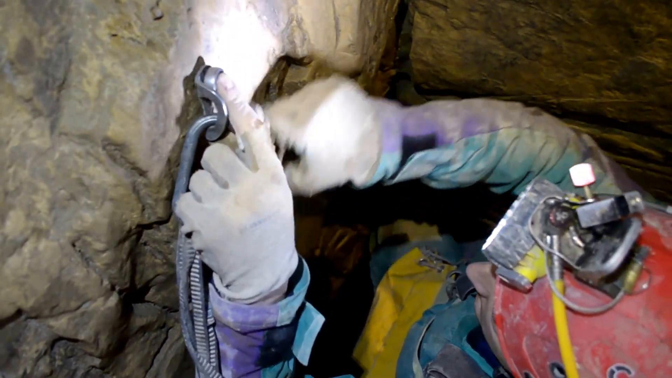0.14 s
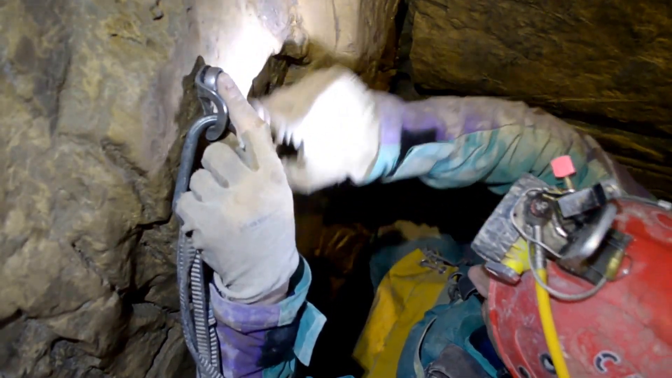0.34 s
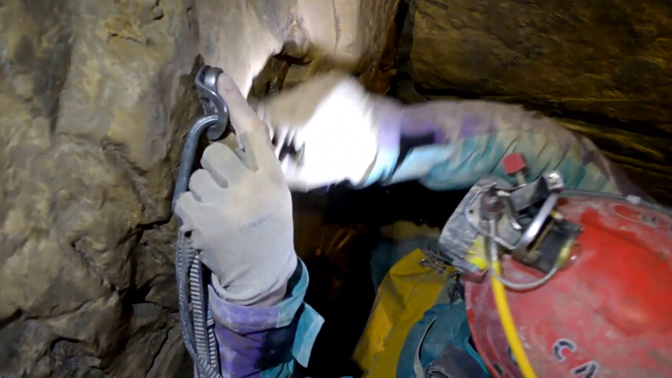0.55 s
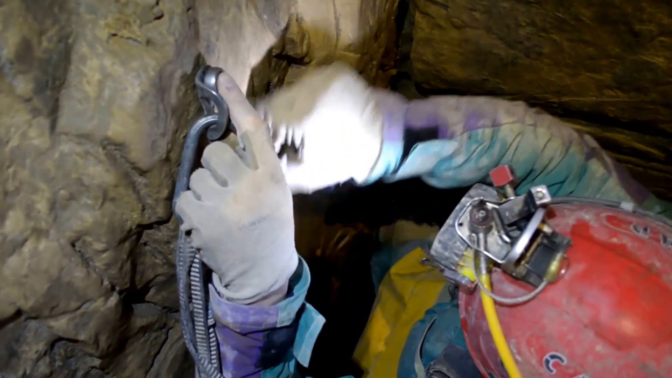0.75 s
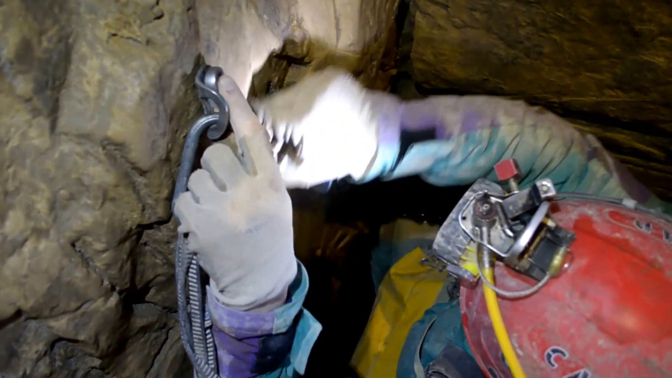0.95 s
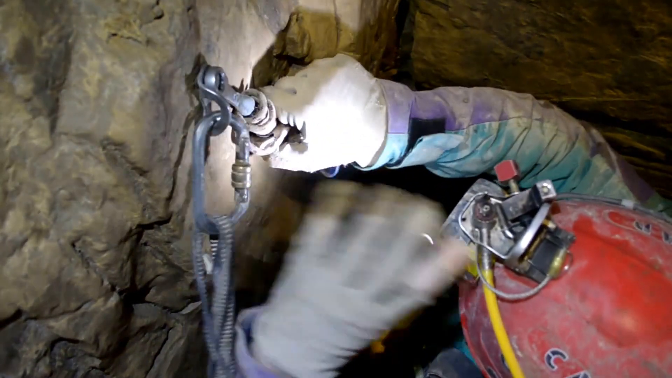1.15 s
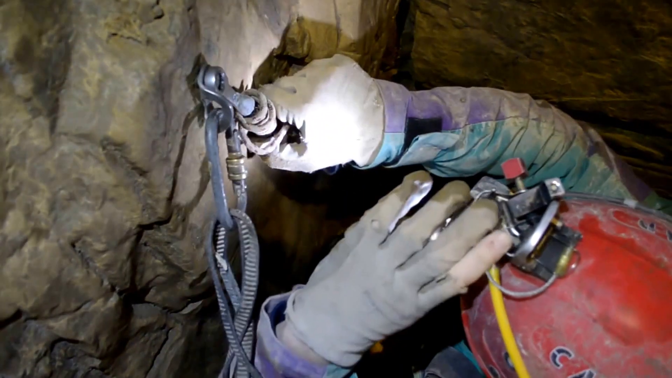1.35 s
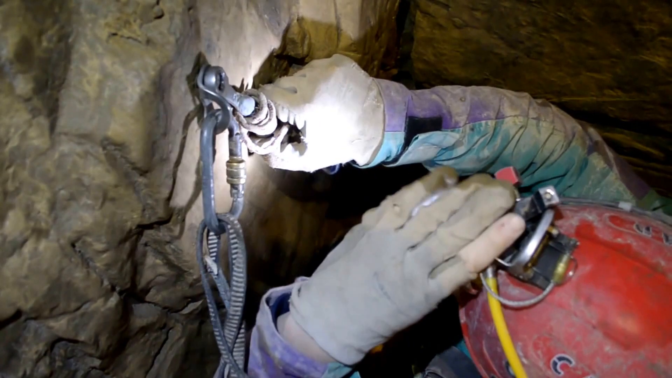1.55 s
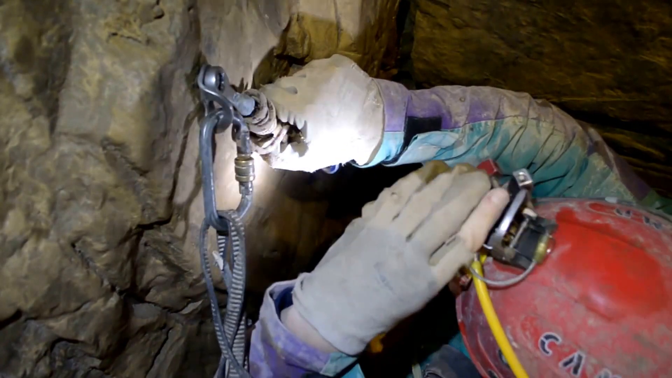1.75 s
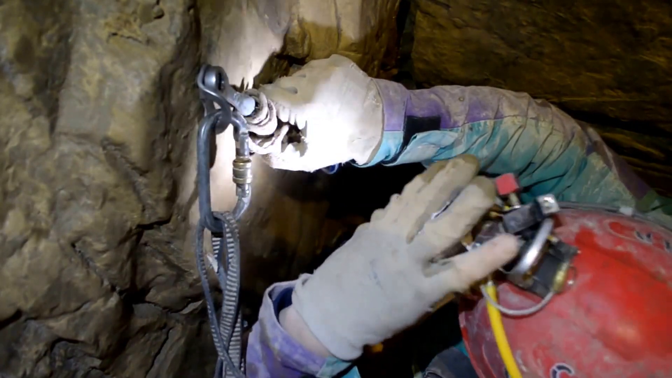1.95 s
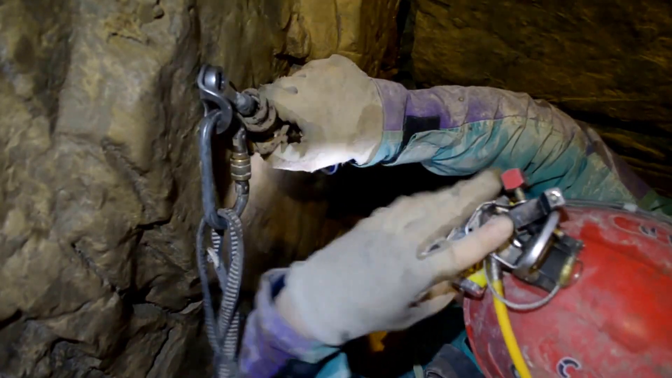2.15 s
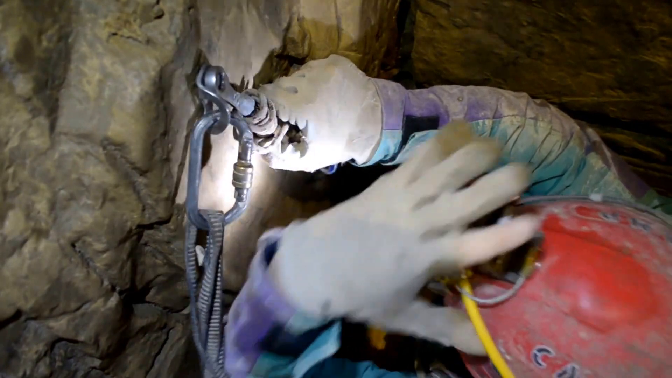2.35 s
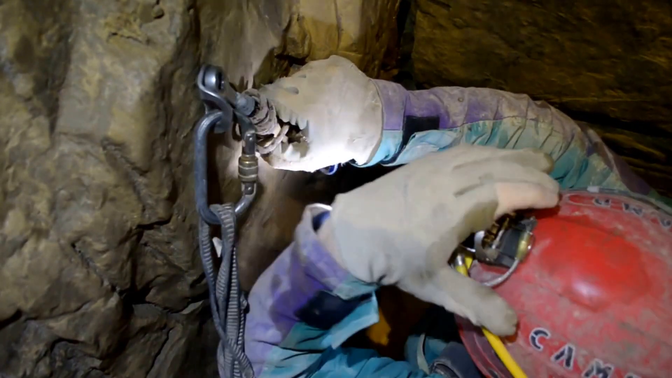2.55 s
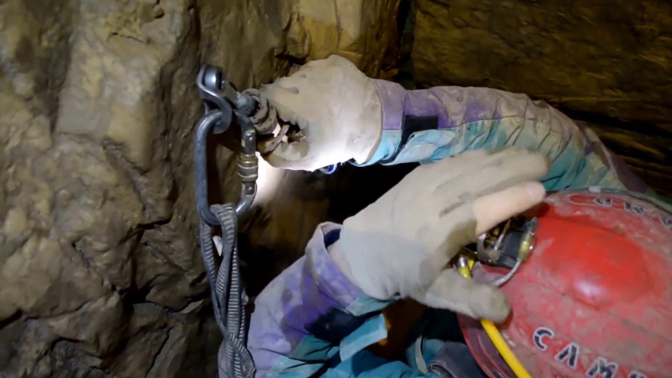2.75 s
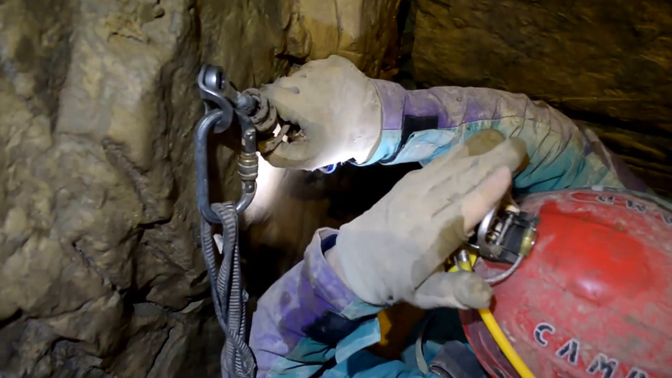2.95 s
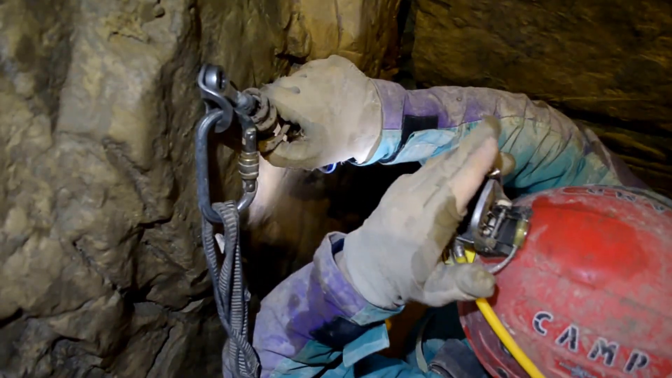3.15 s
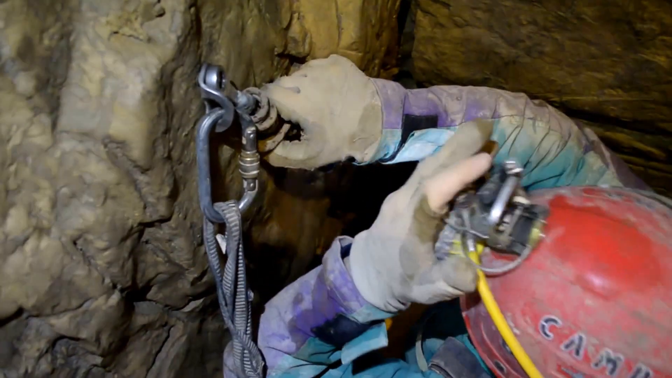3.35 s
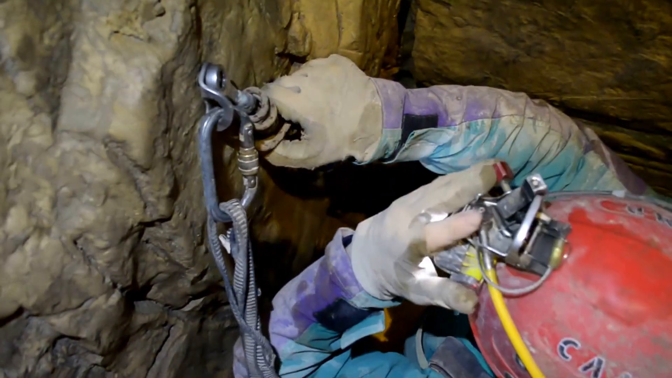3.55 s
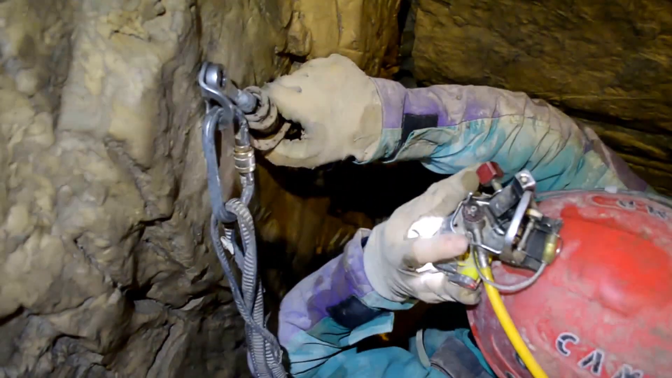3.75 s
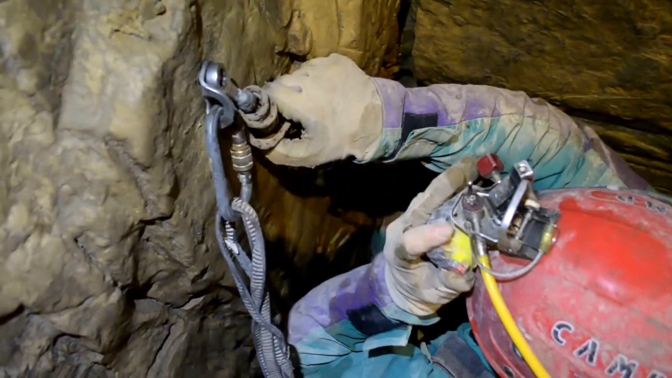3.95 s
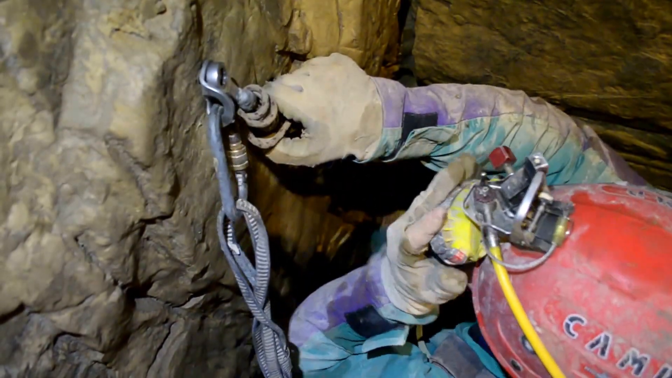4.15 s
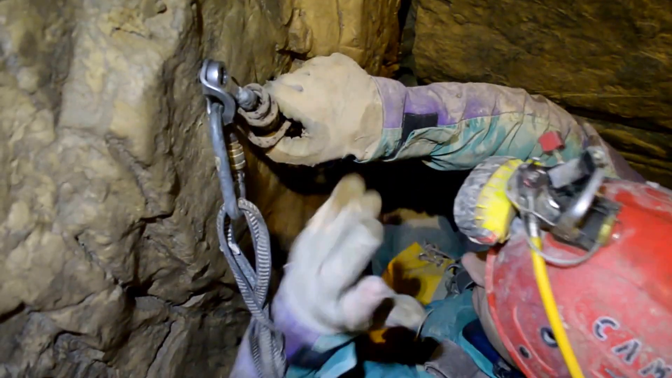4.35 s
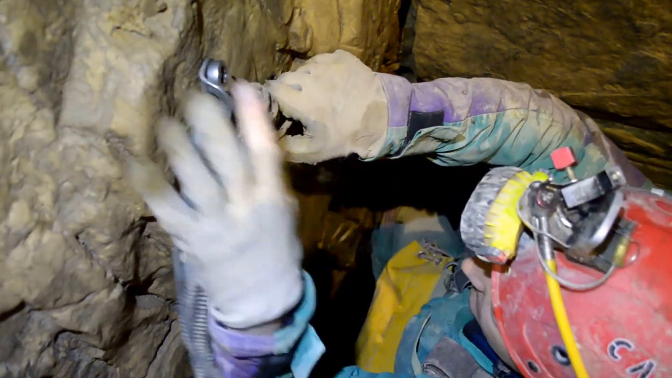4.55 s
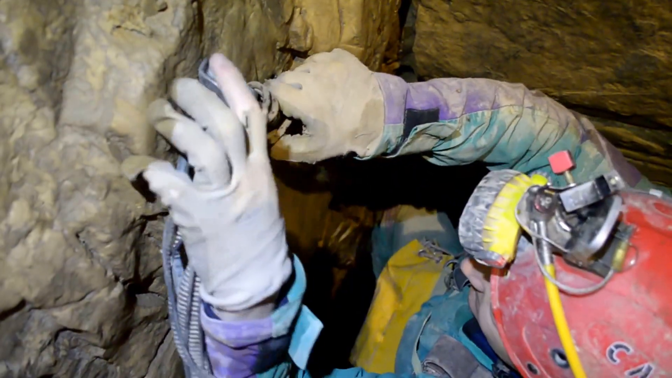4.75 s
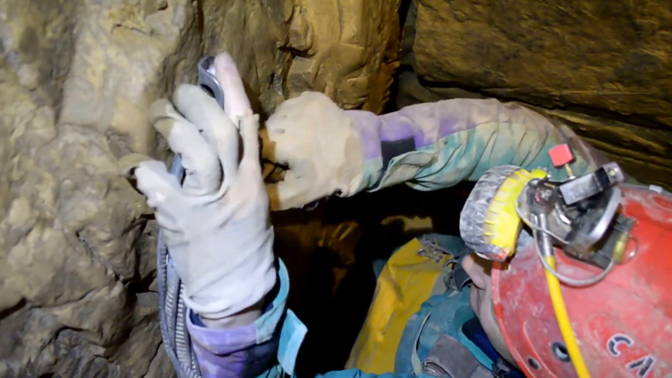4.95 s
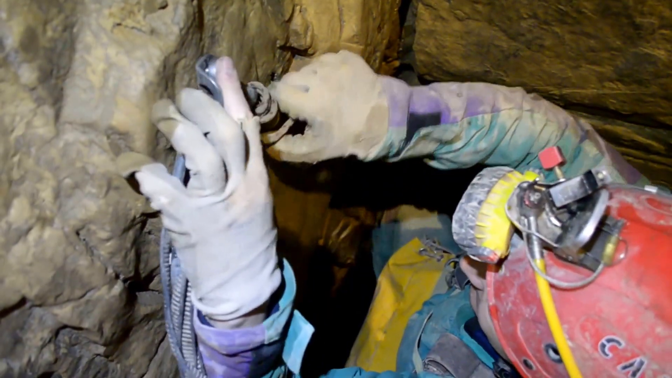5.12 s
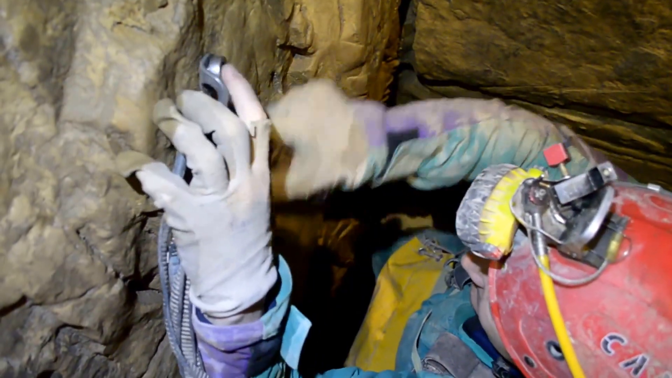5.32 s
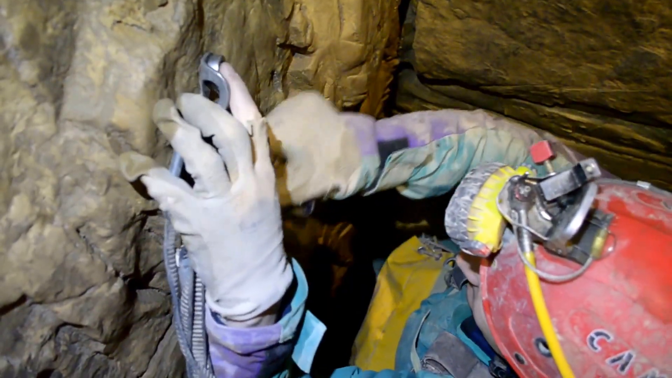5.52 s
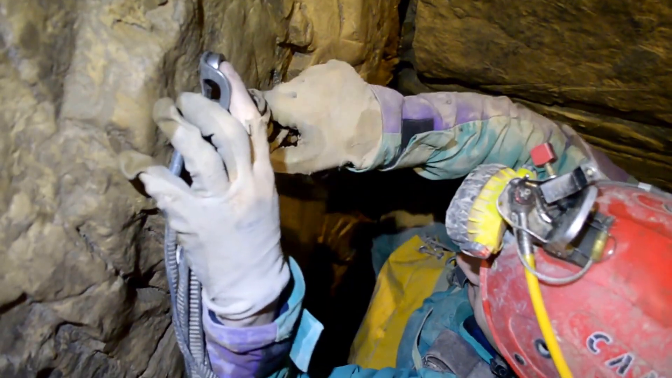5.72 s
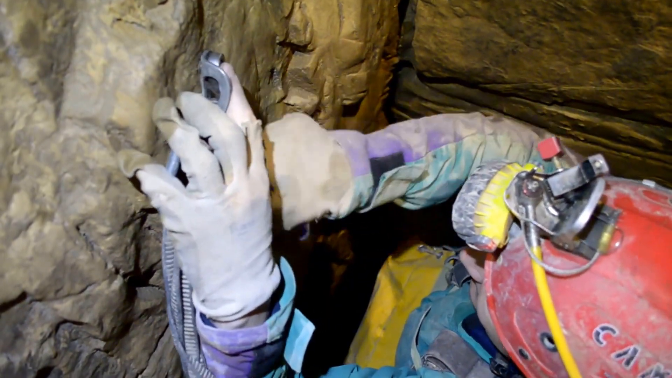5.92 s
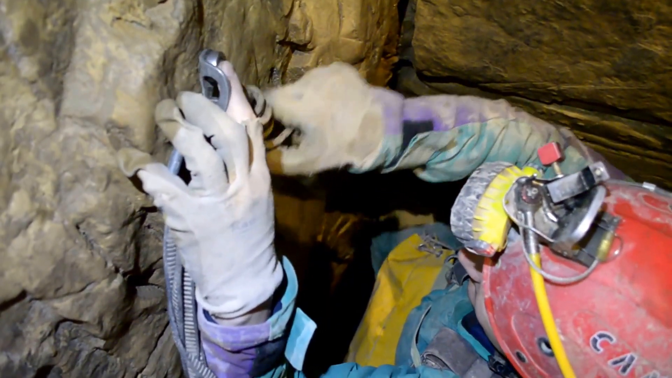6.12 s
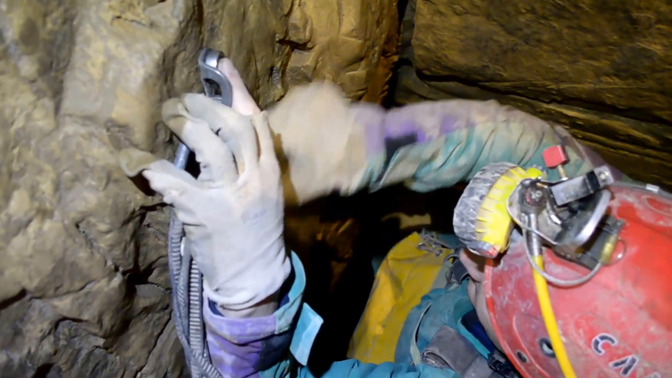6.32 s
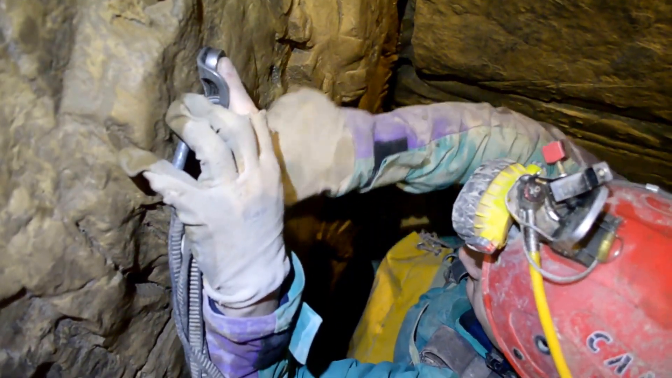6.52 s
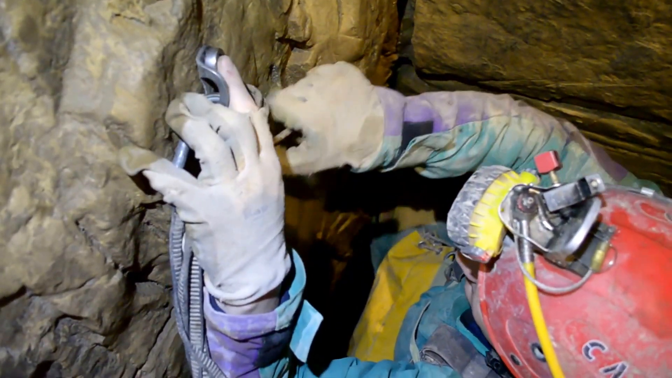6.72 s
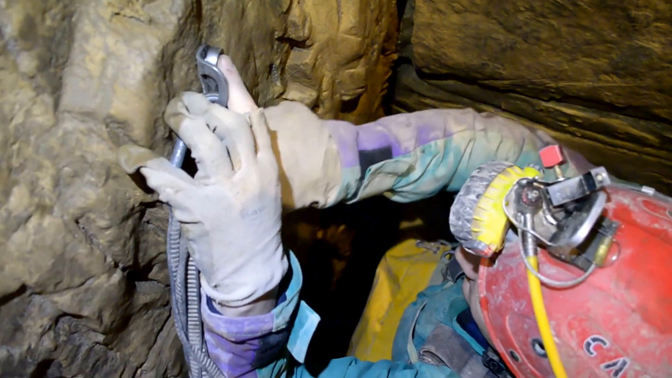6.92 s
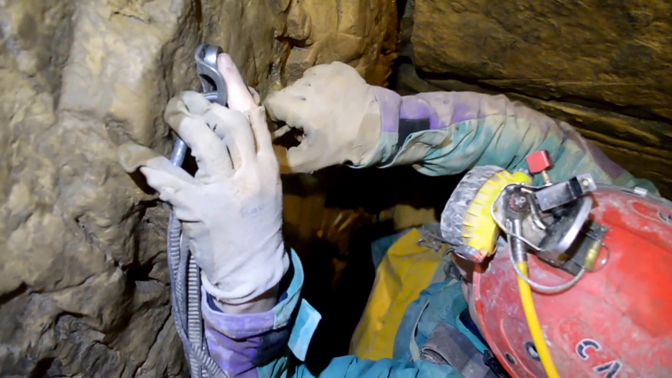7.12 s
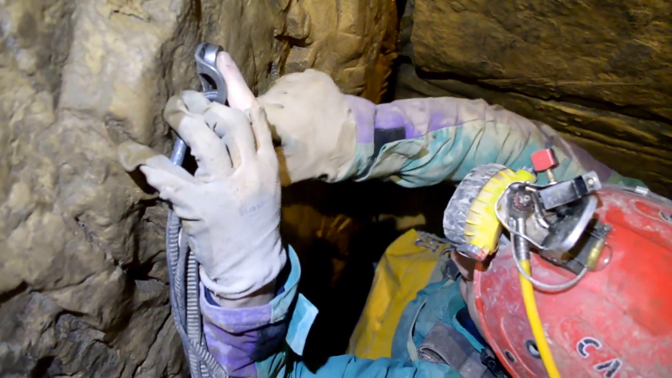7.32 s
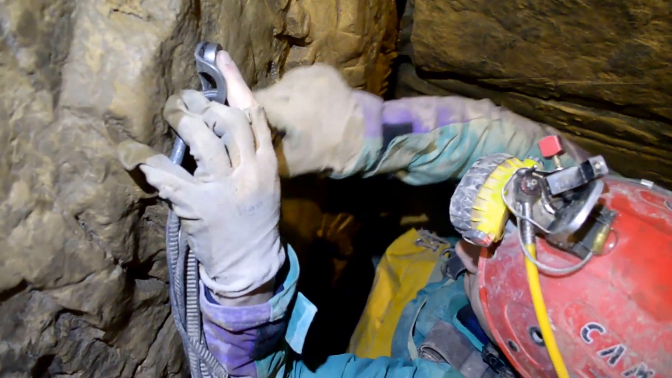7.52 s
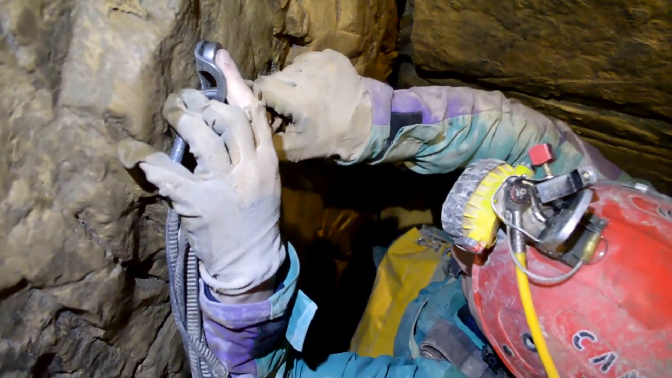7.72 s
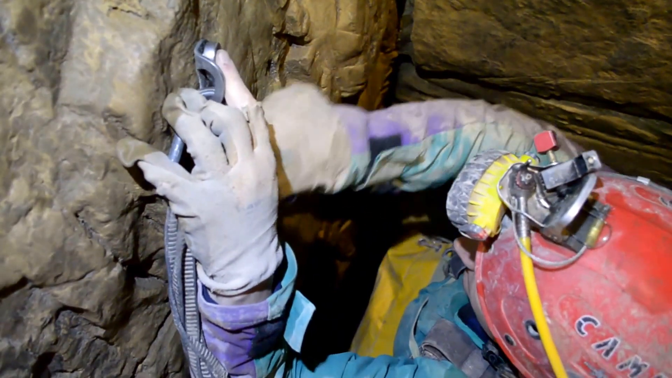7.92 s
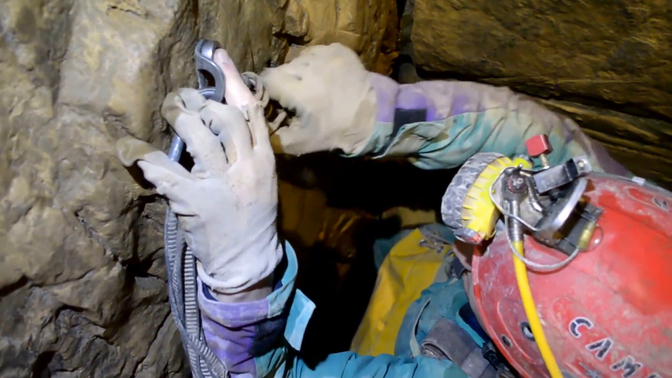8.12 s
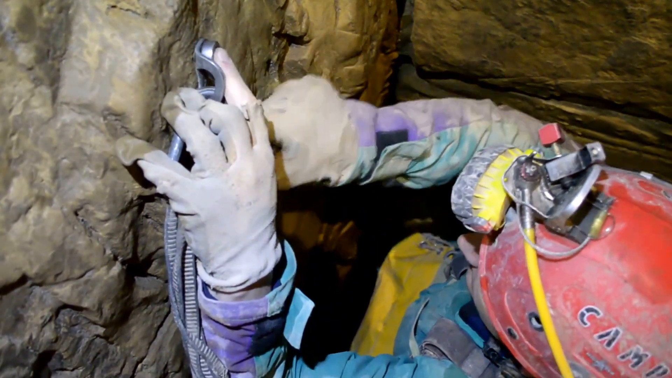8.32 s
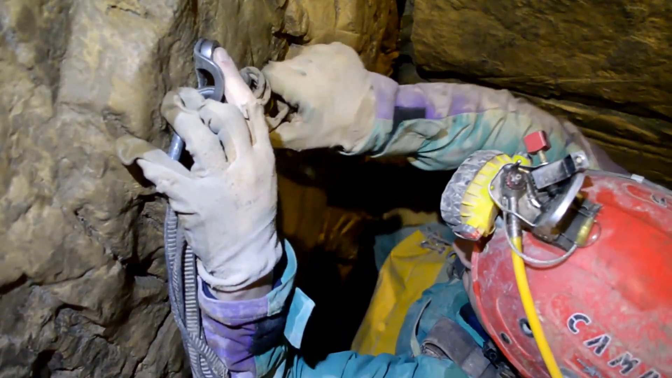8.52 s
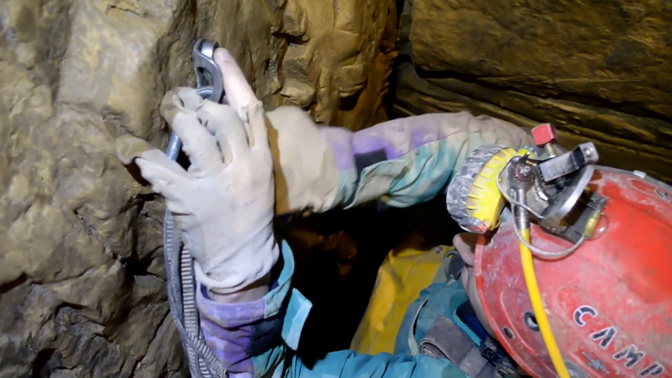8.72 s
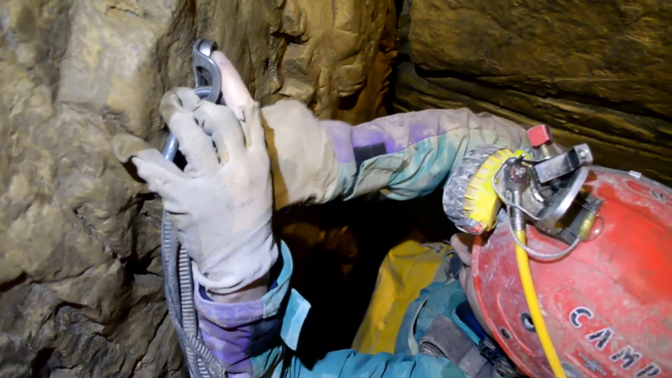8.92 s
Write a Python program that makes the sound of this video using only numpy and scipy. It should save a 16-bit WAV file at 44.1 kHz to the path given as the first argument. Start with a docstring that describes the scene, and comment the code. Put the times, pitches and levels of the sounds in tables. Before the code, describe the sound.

Close to the microphone in a narrow rock passage, coated cloth swishes in short arm strokes with small bright carabiner clinks. A glove rubs a hollow helmet and knocks its lamp, one knock strong. Near four seconds, six rapid ratchet snaps crack out, extremely loud and clipping. Rustling resumes with clinks and later dull, close gear bumps, over faint cave rush and a very thin high whine.

```python
"""In a narrow rock passage, two cavers work at a bolt, with the microphone close by.
One works an arm back and forth: grains of slipping cloth make the sleeve swish, and carabiners clink.
The other rubs a glove over a helmet lamp, knocks it, then tilts it through six ratchet notches: noise bursts
and decaying modes, loud enough to overload the microphone. Later, gear bumps dully close to the microphone.
Filtered echoes of the rock, the faint rush of the cave and a thin electronic whine lie around it all."""
import sys
import numpy as np
from scipy import signal
from scipy.fft import rfft, irfft, next_fast_len
from scipy.io import wavfile

SR = 44100
rng = np.random.default_rng(int(sys.argv[2]) if len(sys.argv) > 2 else 0)


def store_pcm(level_fs):
    """Save levels as 16-bit WAV."""
    pcm = np.round(np.clip(level_fs, -1, 1) * 32767).astype(np.int16)
    wavfile.write(sys.argv[1], SR, np.atleast_2d(pcm).T)


N = 399987
TIME = np.arange(N) / SR  # seconds from the start
AGE = TIME[:SR // 2]  # seconds since a contact, up to half a second

# spectrum of cloth hiss, shared by the carabiner gate: (frequency [Hz], level [dB])
HISS_SPECTRUM = [(1500, -11), (2600, -3.5), (3800, 6), (8100, -2.5), (11400, -0.5), (14000, -11),
                 (16000, -19.5)]


def lamp_ratchet():
    """Each notch of the lamp hinge snaps into the helmet shell and rings its modes."""
    # notches of the hinge: (time [s], level [dB], boost of the lower modes [dB])
    notches = [(3.9229, -10, -1), (3.9566, -2.5, -3), (3.994, -3, -3), (4.0543, -3.5, -1.5),
               (4.0942, -3, 1.5), (4.1250, -2.5, 4)]
    # resonances of the helmet shell: (frequency [Hz], level [dB])
    helmet_modes = [(395, -21.5), (468, -19), (513, -12), (832, -14), (893, -14.5), (1590, -10.5),
                    (1868, -10.5), (2024, -8.5), (2190, -12.5), (2470, -1.5), (2560, -3.5), (2657, -3.5),
                    (2915, -1.5), (3110, -11.5)]
    # spectrum of the snap: (frequency [Hz], level [dB])
    notch_spectrum = [(150, -25), (300, -7), (420, -10), (680, -4.5), (880, -0.5), (1150, -10), (1450, -2),
                      (2550, 0), (3400, -10.5), (6000, -14), (7000, -18), (11000, -16), (16000, -36)]
    out = np.zeros(N)
    for start, db, boost_db in notches:
        # lift the modes up to 2300 Hz against those near 2900 Hz, or the reverse
        tone = [(2300, boost_db), (2900, -boost_db), (4000, 0)]
        snap = blow(notch_spectrum, helmet_modes, tone, crack_t60=0.023,
                    scatter_db=-12.5, scatter_t60=0.13, ring_db=1, ring_t60=0.25)
        add(out, start, from_db(db) * snap)
    return out


def lamp_knocks():
    """A hand knocks lamp and helmet: hollow plastic modes under a short rattle."""
    # knocks: (time [s], level [dB], brightness [dB per octave])
    knocks = [(1.263, -37.5, -2), (1.604, -42, -1), (1.755, -45.5, 2), (1.976, -37.5, -1.5),
              (2.875, -15.5, -0.5), (2.902, -32.5, -6.5)]
    # resonances of the lamp housing: (frequency [Hz], level [dB])
    lamp_modes = [(519, -16), (824, -7.5), (1520, 0), (1912, -4), (2465, -3)]
    # spectrum of the knock: (frequency [Hz], level [dB])
    knock_spectrum = [(60, -35), (300, -9.5), (1900, -5), (3600, -21.5), (6000, -18.5), (12500, -18.5),
                      (16000, -39)]
    return contacts(knocks, knock_spectrum, lamp_modes, crack_t60=0.019,
                    scatter_db=12, scatter_t60=0.074, ring_db=5.0, ring_t60=0.18)


def helmet_rub(low_db=-9, grip_db=4):
    """The glove drags over the helmet in fits and starts and draws two hollow shell tones from it."""
    # pressure of the glove, as level of the shell tones: (time [s], level [dB])
    grip = [(1.2, -96), (1.52, -47), (1.8, -71.5), (2.6, -47.5), (3.1, -52), (3.7, -55.5), (4.3, -65)]
    slips = grains(660, spread_db=6.5) * from_db(grip_db * drift(rate=17))
    high_tone = resonate(slips, hz=845, width_hz=81)
    low_tone = resonate(slips, hz=520, width_hz=31)
    pressure = from_db(np.interp(TIME, *np.transpose(grip)))
    return pressure * (high_tone + from_db(low_db) * low_tone)


def glove_rubs(slips_per_s=1500):
    """Stick-slip pulses sound one resonance, swelling fast and fading: a tone if narrow, a scrape if wide."""
    # gloves on gear: (time [s], length [s], level [dB], pitch [Hz], width of each of two passes [Hz])
    rubs = [(1.26, 0.039, -39, 865, 25), (1.378, 0.072, -48, 865, 25), (1.904, 0.048, -40.5, 533, 420),
            (1.983, 0.036, -44, 280, 480), (2.277, 0.045, -34.5, 2450, 332), (2.788, 0.13, -40, 1480, 450),
            (3.626, 0.055, -46.5, 3000, 450), (3.662, 0.085, -44.5, 2450, 250),
            (7.033, 0.047, -34.5, 994, 250), (7.062, 0.06, -33, 880, 250)]
    out = np.zeros(N)
    slips = grains(slips_per_s, spread_db=4)
    for start, length, db, hz, width_hz in rubs:
        age = AGE[AGE < length]
        excerpt = slips[round(start * SR):][:len(AGE)]
        ringing = resonate(resonate(excerpt, hz, width_hz), hz, width_hz)
        settled = rms_one(ringing[-len(age):])  # the end, once the resonance has built up
        swell = np.sin(np.pi * np.sqrt(age / length))
        add(out, start, from_db(db) * settled * swell)
    return out


def sleeve(crinkle_db=-3):
    """Coated cloth slides on itself: dense fibre slips, with sparser crinkles in the treble."""
    # spectrum of the swish: (frequency [Hz], level [dB])
    swish_spectrum = [(100, -15), (660, -6.5), (900, 3), (1080, 1), (1270, -5.5), (1520, 4.5), (1850, -4.5),
                      (2220, -1.5), (3200, -9), (9000, -44)]
    swish_gain, hiss_gain = arm_motion()
    swish = folding(colour(grains(9000, spread_db=3), swish_spectrum), depth_db=1.6, rate=30)
    fibres = rng.standard_normal(N)
    crinkles = from_db(crinkle_db) * grains(700, spread_db=5.5)
    hiss = folding(colour(fibres + crinkles, HISS_SPECTRUM), depth_db=3.0, rate=34)
    return swish_gain * swish + hiss_gain * hiss


def arm_motion():
    """Strength of swish and hiss: arm strokes over constant fidgeting, as the cloth catches and lets go."""
    # arm strokes, each sliding the sleeve once:
    # (time [s], length [s], swish level [dB], hiss above the swish [dB])
    strokes = [(0.106, .12, -43, -10), (0.378, 0.12, -45.5, -4), (0.528, 0.17, -41, -6.5),
               (0.917, 0.28, -45.5, -5), (2.051, 0.22, -49.5, -6), (2.387, 0.18, -41, -10.5),
               (2.65, 0.34, -44, -13), (3.317, 0.14, -36, -9.5), (4.659, 0.12, -46.5, -5),
               (4.785, 0.072, -46.5, -5.5), (4.916, 0.049, -45, -7.5), (5.31, 0.26, -41, -5.5),
               (5.554, 0.15, -43.5, -5.5), (5.83, 0.085, -41, -3.5), (5.914, 0.096, -45.5, -11),
               (6.06, 0.13, -43.5, -5.5), (6.31, 0.14, -46.5, -2.5), (6.408, 0.043, -39, -7.5),
               (6.575, 0.065, -38.5, -13), (6.602, 0.099, -43.5, -4.5), (6.81, 0.059, -48.5, 0.5),
               (6.892, 0.044, -43, -6), (6.978, 0.22, -44.5, -9), (7.301, 0.17, -42.5, -7.5),
               (7.51, 0.17, -40, -9), (7.761, 0.073, -45, -7), (7.942, 0.15, -38.5, -9.5),
               (7.998, 0.079, -38.5, -8.5), (8.241, 0.062, -40.5, -6), (8.632, 0.12, -42.5, -2),
               (8.756, 0.072, -43, -9), (9.039, 0.12, -47, 3)]
    # restlessness of the bodies between strokes, as level of the rustle: (time [s], level [dB])
    restlessness = [(0, -51.5), (1.15, -51.5), (1.35, -57.5), (1.5, -48), (1.8, -55), (2.6, -47.5),
                    (3.2, -56.5), (3.5, -50), (4.4, -53), (5.25, -51.5), (5.75, -62.5), (6.45, -50.5),
                    (6.75, -56), (7.2, -48.5), (7.7, -52.5), (8.15, -43.5), (8.55, -54.5), (9.07, -47)]
    fidget = from_db(np.interp(TIME, *np.transpose(restlessness)) + 1.5 * drift(rate=16))
    fidget_hiss = from_db(-10) * fidget
    swish, hiss = np.zeros((2, N))
    for start, length, db, hiss_db in strokes:
        speed = stroke(length)
        add(swish, start, from_db(db) * speed)
        add(hiss, start, from_db(db + hiss_db) * speed)
    catching = from_db(1.6 * drift(rate=130))
    return catching * np.hypot(swish, fidget), catching * np.hypot(hiss, fidget_hiss)


def stroke(length, peak_share=0.24):
    """Arm speed: it rises quickly to a peak at this share of the stroke, then coasts to rest."""
    phase = np.interp(AGE[AGE < length] / length, [0, peak_share, 1], [0, np.pi / 2, np.pi])
    return np.sin(phase)


def folding(x, depth_db, rate):
    """Shifting folds favour now one band of the rustle, now another; rms 1."""
    out, edges = 0, np.geomspace(90, 17000, 12)
    for low, high in zip(edges, edges[1:]):
        bandpass = signal.butter(2, [low, high], "band", fs=SR, output="sos")
        out = out + signal.sosfiltfilt(bandpass, x) * from_db(depth_db * drift(rate))
    return rms_one(out)


def hardware():
    """Small bright clinks, each at a pitch of its own, damped quickly by glove and rope."""
    # carabiners and tool touching: (time [s], level [dB], brightness [dB per octave])
    clinks = [(0.020, -34, 6), (.409, -43, 1), (.466, -44, -1.5), (.802, -44.5, 6), (3.214, -40, -0.5),
              (4.640, -32, -2.5), (4.659, -31.5, 1.5), (4.821, -40.5, -2.5), (4.870, -49, 1),
              (5.452, -32.5, 9), (5.498, -30.5, 3.5), (6.863, -30.5, -1)]
    # resonances of the metal: (frequency [Hz], level [dB])
    metal_modes = [(5200, -19), (8900, -4), (9700, 7.5), (10700, 10.5), (11800, -1)]
    # spectrum of the clink: (frequency [Hz], level [dB])
    clink_spectrum = [(250, -6), (1500, 11), (4000, 2), (5500, 4.5), (10500, 2), (13000, -1), (16000, -21)]
    return contacts(clinks, clink_spectrum, metal_modes, crack_t60=0.025, scatter_db=-5,
                    scatter_t60=0.1, ring_db=-11.5, ring_t60=0.13, snap=7, detune=0.036)


def gate_ticks(t60=0.0054):
    """A carabiner gate catches with tiny dry ticks: noise that dies in a few ms, with no ring."""
    # ticks of the gate: (time [s], level [dB])
    ticks = [(4.701, -45), (4.709, -39), (4.724, -43), (6.309, -50.5)]
    out = np.zeros(N)
    for start, db in ticks:
        burst = from_db(-60 * AGE / t60) * rng.standard_normal(len(AGE))
        tick = colour(burst, HISS_SPECTRUM)
        add(out, start, from_db(db) * rms_one(tick[AGE < t60]))
    return out


def gear_bumps():
    """Gear bumps near the microphone: short dull clacks with a brief ring."""
    # bumps: (time [s], level [dB], brightness [dB per octave])
    bumps = [(6.867, -34, -0.5), (7.037, -31.5, -1), (7.742, -27, -0.5), (7.751, -30, -1.5),
             (7.867, -36, 5), (8.192, -32.5, -5), (8.357, -43.5, -5), (8.432, -38, 5), (8.642, -28, -3.5),
             (8.892, -21.5, 1.5), (8.909, -39, -4.5)]
    # resonances of the gear: (frequency [Hz], level [dB])
    gear_modes = [(1020, -3), (1370, 1.5)]
    # spectrum of the bump: (frequency [Hz], level [dB])
    bump_spectrum = [(30, -43), (90, -20), (470, -11.5), (1090, 3), (2050, -2.5), (3300, -22), (16000, -41)]
    return contacts(bumps, bump_spectrum, gear_modes, crack_t60=0.042, scatter_db=-12,
                    scatter_t60=0.056, ring_db=4, ring_t60=0.03, snap=7.6, detune=0.038)


def near_rock(x, echo_db, count=24):
    """Ledges up to about four metres off return a cluster of quick reflections, the later ones weaker."""
    delays = rng.uniform(.002, .022, count)  # seconds, there and back
    echoes = np.zeros(len(AGE))
    echoes[(delays * SR).astype(int)] = rng.choice([-1, 1], count) / np.sqrt(delays)
    echoes = echoes / np.linalg.norm(echoes)
    gain = from_db(echo_db)
    return (x + gain * signal.fftconvolve(x, echoes)[:N]) / np.hypot(1, gain)


def passage(x):
    """The rock passage answers with a diffuse tail: the lows last longest, the top treble dies first."""
    # decay of the passage: (frequency [Hz], time to fall by 60 dB [s])
    rock_t60 = [(450, 0.81), (900, 0.34), (2600, 0.35), (5800, 0.49), (8000, 0.23)]
    tail, edges = 0, np.geomspace(60, 16000, 17)
    for low, high in zip(edges, edges[1:]):
        bandpass = signal.butter(2, [low, high], "band", fs=SR, output="sos")
        band = signal.sosfilt(bandpass, rng.standard_normal(len(AGE)))
        tail = tail + band * from_db(-60 * AGE / at_hz(rock_t60, np.sqrt(low * high)))
    tail = tail * np.minimum(AGE / 0.0066, 1)  # the tail builds up over 6.6 ms
    return signal.fftconvolve(x, tail / np.linalg.norm(tail))[:N]


def cave_air(level_db=-55):
    """The faint steady rush of the cave: noise weighted towards the lows."""
    # spectrum of the rush: (frequency [Hz], level [dB])
    cave_spectrum = [(30, -19.5), (70, -6), (230, -4.5), (300, 2), (380, -6), (900, -5), (5000, -25.5),
                     (16000, -29)]
    return from_db(level_db) * rms_one(colour(rng.standard_normal(N), cave_spectrum))


def electronic_whine(hz=15680, level_db=-78):
    """A thin electronic whine: one steady, very high sine."""
    return from_db(level_db) * rms_one(np.sin(2 * np.pi * hz * TIME))


def contacts(rows, spectrum, modes, **decay):
    """Play a table of blows on one body, each with its own level and brightness."""
    out = np.zeros(N)
    for start, db, bright in rows:
        add(out, start, from_db(db) * blow(spectrum, modes, slope(bright), **decay))
    return out


def blow(spectrum, modes, tone, crack_t60, scatter_db, scatter_t60, ring_db, ring_t60, snap=0, detune=0):
    """A contact snaps, cracks, rattles briefly and rings the body; rms 1 over its first 10 ms."""
    attack = slice(SR // 100)
    fade = from_db(-60 * AGE / crack_t60) + from_db(scatter_db - 60 * AGE / scatter_t60)
    force = fade * rng.standard_normal(len(AGE))
    force[0] += snap
    crack = colour(force, spectrum)
    hz, db = np.transpose(modes)[:, :, None]
    t60 = ring_t60 * (hz[0] / hz) ** 1.07  # higher modes die sooner
    # the point of contact changes from blow to blow: so do mode strengths and, with detune, pitches
    hz = hz * (1 + detune * rng.standard_normal(hz.shape))
    strength = from_db(db + rng.normal(0, 2, db.shape)) * rng.choice([-1, 1], db.shape)
    partials = strength * from_db(-60 * AGE / t60) * np.sin(2 * np.pi * hz * AGE)
    ring = np.sum(partials, axis=0)
    sound = colour(crack / np.std(crack[attack]) + from_db(ring_db) * ring, tone)
    return sound / np.std(sound[attack])


def grains(per_s, spread_db):
    """Tiny slips of uneven size at random moments; rms 1."""
    sizes = from_db(spread_db * np.minimum(rng.exponential(1, N), 4)) * rng.choice([-1, 1], N)
    return rms_one(sizes * (rng.random(N) < per_s / SR))


def resonate(x, hz, width_hz):
    """Two-pole resonance; rms 1."""
    radius = np.exp(-np.pi * width_hz / SR)
    poles = [1, -2 * radius * np.cos(2 * np.pi * hz / SR), radius * radius]
    return rms_one(signal.lfilter([1, 0, -1], poles, x))


def drift(rate):
    """Slow random wander of rms 1, with this many random turning points a second."""
    knots = rng.standard_normal(4000)
    return rms_one(np.interp(TIME * rate, np.arange(len(knots)), knots))


def colour(x, spectrum):
    """Causal (minimum-phase) filter with the given spectrum."""
    size = 2 * next_fast_len(len(x) // 2 + SR // 20)
    hz = np.arange(size // 2 + 1) * SR / size
    cepstrum = irfft(np.log(from_db(at_hz(spectrum, hz))))
    # folding the cepstrum onto positive time gives minimum phase
    cepstrum[1:size // 2] *= 2
    cepstrum[size // 2 + 1:] = 0
    return irfft(rfft(x, size) * np.exp(rfft(cepstrum)))[:len(x)]


def slope(db_per_octave):
    """A spectrum that tilts evenly over six octaves."""
    return [(200, 0), (12800, 6 * db_per_octave)]


def at_hz(points, hz):
    """Read a table on a log-frequency axis."""
    f, value = np.transpose(points)
    return np.interp(np.log(hz + 1), np.log(f), value)


def from_db(db):
    """Decibels to gain."""
    return 10 ** (np.asarray(db) / 20)


def rms_one(x):
    """Scale to unit rms."""
    return x / np.sqrt(np.mean(x ** 2) + 1e-20)


def add(track, start_s, sound):
    """Mix a sound in from the given time."""
    start = max(0, round(start_s * SR))
    track[start:start + len(sound)] += sound[:N - start]


def scene(room_db=-22):
    """Handling with ledge echoes and passage tail, cloth with ledge echoes, dry bumps, and the background."""
    contact_sounds = lamp_ratchet() + lamp_knocks() + glove_rubs() + hardware() + gate_ticks()
    handling = near_rock(contact_sounds, echo_db=-10.0)
    cloth = near_rock(sleeve() + helmet_rub(), echo_db=-11)
    reverberation = from_db(room_db) * passage(handling)
    background = cave_air() + electronic_whine()
    return (handling + reverberation + cloth + gear_bumps() + background)[None]


def record(dry):
    """The microphone overloads: peaks clip at full scale, then a steep low-pass cuts above 16 kHz."""
    clipped = np.clip(dry, -1, 1)
    lowpass = signal.ellip(10, .1, 80, 16000, fs=SR, output="sos")
    return signal.sosfilt(lowpass, clipped)


dry = scene()
out = record(dry)
store_pcm(out)
```